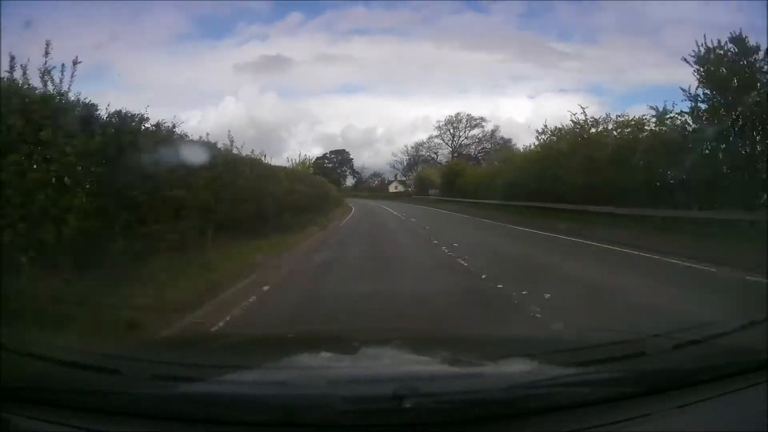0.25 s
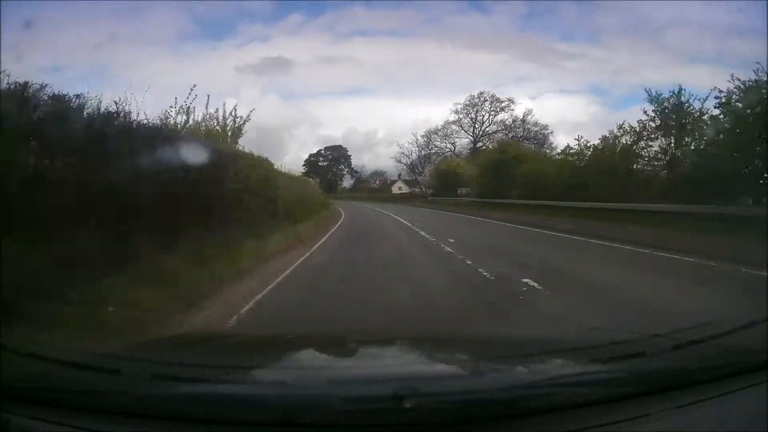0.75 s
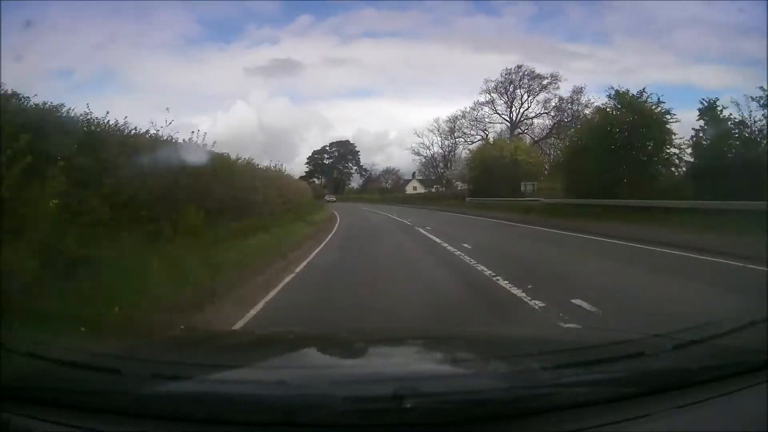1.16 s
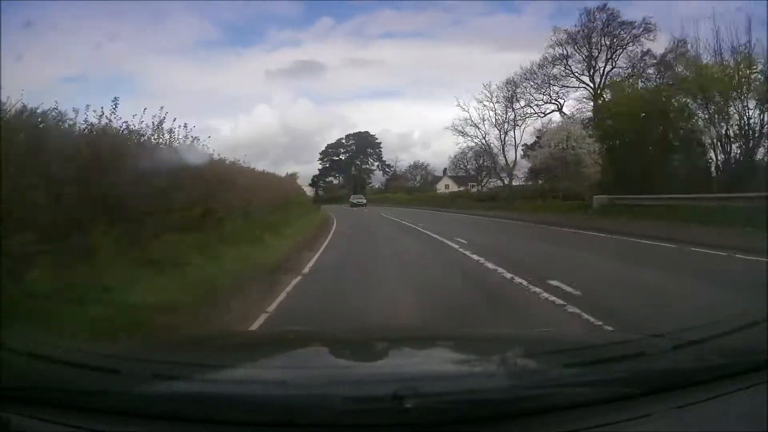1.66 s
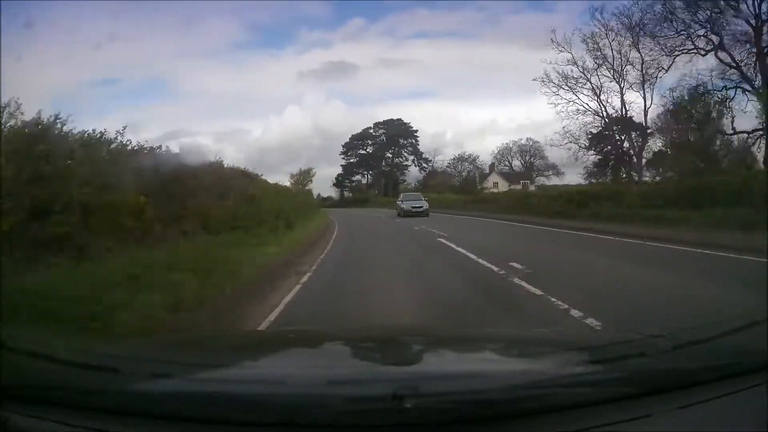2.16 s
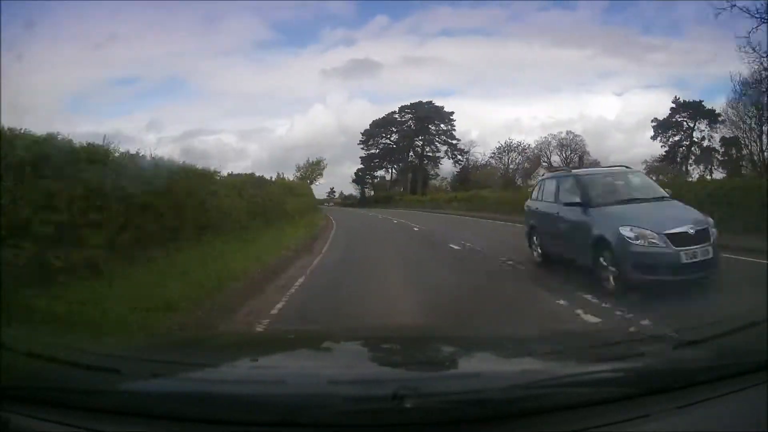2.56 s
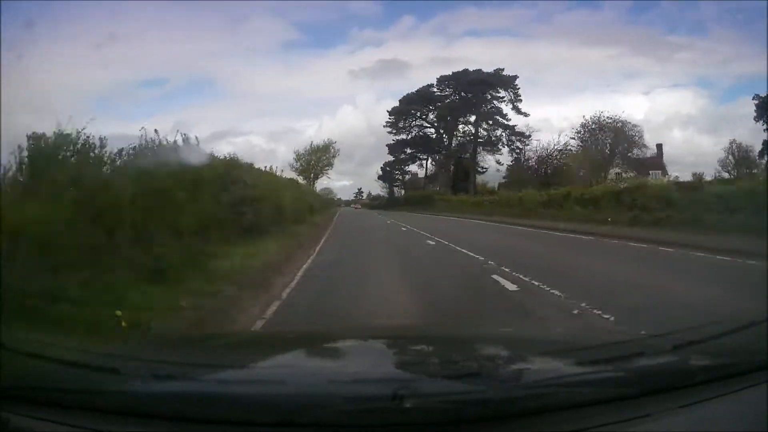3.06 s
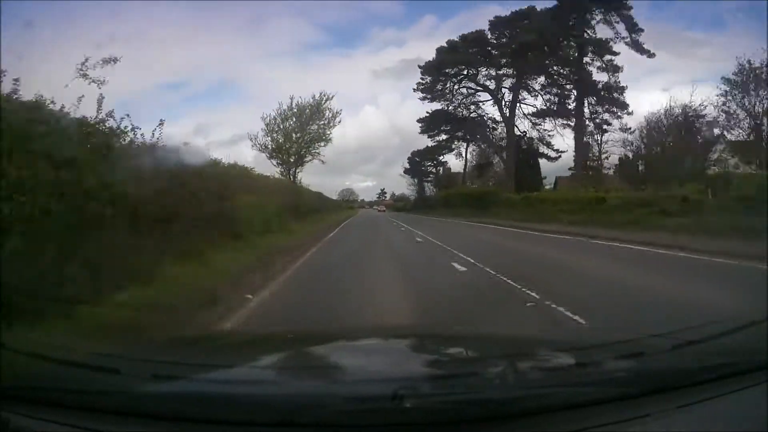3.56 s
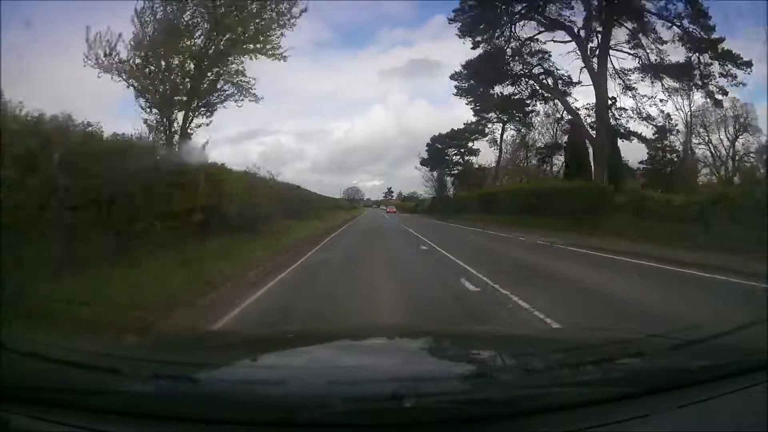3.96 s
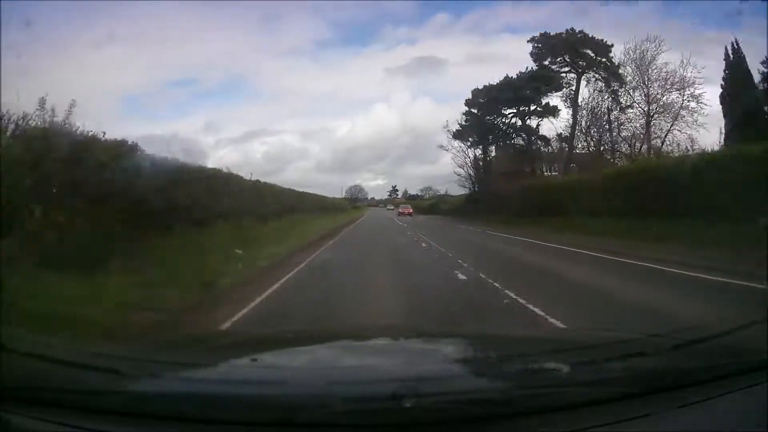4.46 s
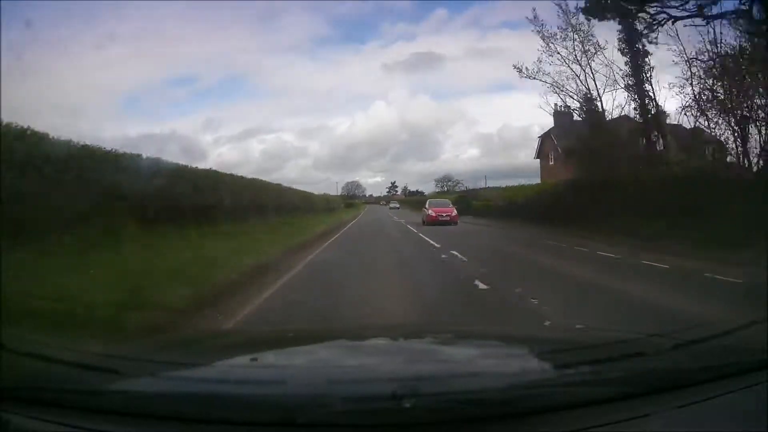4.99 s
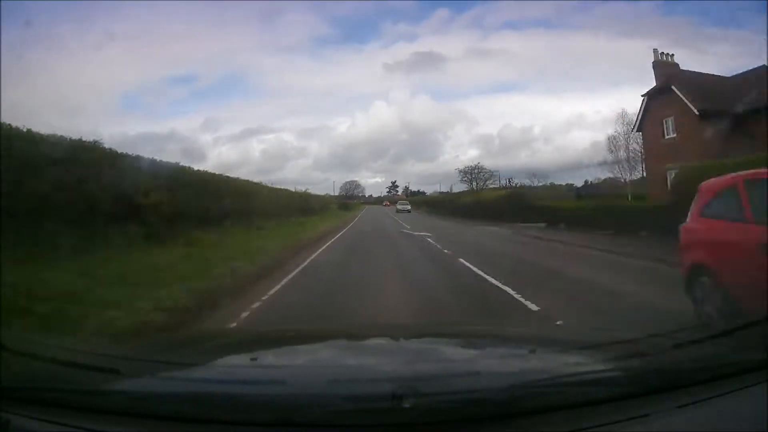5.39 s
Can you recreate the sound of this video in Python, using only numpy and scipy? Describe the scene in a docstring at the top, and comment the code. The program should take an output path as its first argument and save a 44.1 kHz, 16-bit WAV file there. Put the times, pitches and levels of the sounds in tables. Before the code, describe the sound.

A dull, boxy car interior with continuous road roar and engine hum. A few light plastic ticks come first, then a dense irregular rattle from one to three and a half seconds, including a sharp knock with brief chatter. As the rattle thins out, the coasting engine takes load again, its buzzing growl and intake noise swelling to the end. Everything is close and nearly dry, in mono.

```python
"""Car cabin on a country road

A five-cylinder engine coasts, then pulls: sine waves follow its turning, the loud ones sliding through the
cabin boom, with intake noise beside them. Shaped noise makes the rumble, tyre roar and wind hiss.
A loose plastic part by the microphone rattles in ticks and once knocks hard: clicks set its modes ringing.
"""
import sys
import numpy as np
from scipy import signal
from scipy.fft import rfft, irfft
from scipy.io import wavfile

SR = 44100
rng = np.random.default_rng(int(sys.argv[2]) if len(sys.argv) > 2 else 0)


def transcribe(signal):
    """Save signal, clipped to [-1, 1], as a 16-bit WAV file at the path in sys.argv[1]."""
    frames = np.atleast_2d(signal).T
    limited = np.clip(frames, -1, 1)
    pcm = np.round(limited * 32767).astype(np.int16)
    wavfile.write(sys.argv[1], SR, pcm)


N = 248283
TIME = np.arange(N) / SR  # seconds

# how the engine runs; five firings a cycle: (time [s], engine cycles [Hz], load [dB])
ENGINE_COURSE = [(0, 26.43, -7.5), (.5, 26.36, -10.5), (1.05, 25.63, -15.5), (1.75, 25.34, -16),
                 (2.4, 25.28, -12), (2.75, 25.11, -6.5), (3.15, 25.09, -1), (3.6, 25.24, -0.5),
                 (4.0, 25.65, 1.5), (4.55, 26.05, 3.5), (5.1, 26.6, 4), (5.63, 27, 5.5)]


def from_db(db):
    """Turn decibels into a gain."""
    return 10 ** (np.asarray(db) / 20)


def rms_one(x):
    """Scale a sound to an rms (average strength) of 1."""
    return x / np.sqrt(np.mean(x ** 2) + 1e-20)


def in_time(rows):
    """Draw straight lines between the rows of a table, giving each column a value at every sample."""
    seconds, *columns = np.transpose(rows)
    return [np.interp(TIME, seconds, column) for column in columns]


def at_hz(points, hz):
    """Read a level between the points of a spectrum, on a log-frequency axis."""
    point_hz, point_db = np.transpose(points)
    return np.interp(np.log(hz), np.log(point_hz), point_db)


def drift(rate_hz):
    """Wander slowly by chance: noise through two equal one-pole low-passes at rate_hz, spread 1."""
    step = 40  # one slow value for every 40 samples
    pole = np.exp(-2 * np.pi * rate_hz * step / SR)
    noise = rng.standard_normal(N // step + 2002)
    slow = signal.lfilter([1], [1, -2 * pole, pole * pole], noise)[2000:]  # drop the filter's start
    return np.interp(np.arange(N) / step, np.arange(len(slow)), rms_one(slow))


def coloured(spectrum):
    """Shape noise to a spectrum that falls away beyond both its ends; rms 1."""
    hz = np.arange(N // 2 + 1) * SR / N + 1  # 1 Hz up, so that the logarithm exists
    above = np.maximum(hz / spectrum[-1][0], 1) ** -4
    below = np.minimum(hz / spectrum[0][0], 1) ** 3
    shape = from_db(at_hz(spectrum, hz)) * above * below
    return rms_one(irfft(rfft(rng.standard_normal(N)) * shape, N))


def peaks(x, table):
    """Pass a sound through a chain of resonances (boosts) and dips (cuts)."""
    for hz, width_hz, boost_db in table:
        cosine = np.cos(2 * np.pi * hz / SR)
        gain = from_db(boost_db / 2)
        width = np.pi * width_hz / SR
        top = [1 + width * gain, -2 * cosine, 1 - width * gain]
        bottom = [1 + width / gain, -2 * cosine, 1 - width / gain]
        x = signal.lfilter(top, bottom, x)
    return x


def ring(clicks, hz, t60):
    """Let each click start a dying sine; a unit click gives height 1, and t60 [s] is the time to fall 60 dB."""
    decay = from_db(-60 / (t60 * SR))
    angle = 2 * np.pi * hz / SR
    bottom = [1, -2 * decay * np.cos(angle), decay * decay]
    return signal.lfilter([0, np.sin(angle)], bottom, clicks + 1e-18)


def soften(x, hz):
    """Low-pass: a contact that lasts a moment excites little treble."""
    return signal.sosfilt(signal.butter(4, hz, fs=SR, output="sos"), x)


def road(grain_db, gust_db):
    """Noise for body rumble, suspension thrum, tyre roar and wind; surface grain flickers roar and hiss."""
    # tyre roar over time: (time [s], level [dB])
    roar_course = [(0.0, -22), (0.15, -19.5), (.56, -21), (.65, -23), (.72, -18.5), (.85, -22),
                   (1.2, -19.5), (2.08, -22.5), (2.42, -21), (3.0, -22), (3.25, -20), (3.6, -23),
                   (3.84, -20.5), (4.09, -23), (4.51, -20), (5.6, -20.5)]
    # tyre roar through the body: (frequency [Hz], density [dB per Hz])
    roar_tone = [(400, -20.5), (520, -9), (700, -6), (930, -2), (1200, -6), (1600, -18), (2100, -39)]
    # panels that colour the tyre roar: (frequency [Hz], width [Hz], boost [dB])
    panels = [(705, 45, 3), (891, 42, 5.5), (964, 40, 4), (1138, 52, 3.5)]
    # rumble through the body: (frequency [Hz], density [dB per Hz])
    rumble_tone = [(60, -20.5), (100, -4), (160, -3), (240, -3), (290, 0.5), (380, 3.5), (480, -2),
                   (600, -13)]
    # colour of the suspension thrum: (frequency [Hz], density [dB per Hz])
    thrum_tone = [(20, -7.5), (40, -2.5), (65, -8)]
    # colour of the wind hiss: (frequency [Hz], density [dB per Hz])
    hiss_tone = [(1400, 4), (2000, -2.5), (2900, -11.5), (4000, -15), (5000, -25), (6200, -26.5),
                 (7600, -29.5), (9000, -57), (11300, -33), (12600, -56), (16000, -80.5)]
    rumble_db, rumble_swell_db = -29, 0.9
    thrum_db, thrum_swell_db = -45, 1
    hiss_db, hiss_db_per_hz, pull_s = -39.5, 1.6, 3.7

    roar_db, = in_time(roar_course)
    cycle_hz = in_time(ENGINE_COURSE)[0]
    # from pull_s on, the hiss grows with speed, read from the engine cycle
    faster_hz = (cycle_hz - np.interp(pull_s, TIME, cycle_hz)) * (TIME > pull_s)
    grain = drift(12)
    gusts = 0.37 * grain + drift(43)
    rumble = from_db(rumble_db + rumble_swell_db * drift(3)) * coloured(rumble_tone)
    thrum = from_db(thrum_db + thrum_swell_db * drift(1.5)) * coloured(thrum_tone)
    roar = from_db(roar_db + grain_db * grain) * peaks(coloured(roar_tone), panels)
    hiss = from_db(hiss_db + hiss_db_per_hz * faster_hz + gust_db * gusts) * coloured(hiss_tone)
    return rumble + thrum + roar + hiss


def touches():
    """List each blow and its two lighter lead-in touches: times, then strengths on low, middle, treble modes."""
    # rattle blows: (time [s], level [dB], low modes relative to it [dB], lead-in [s])
    ticks = [(0.111, -23, 2, 0.0027), (.1161, -23.5, -5, .002), (0.165, -27.5, 8, .002),
             (.4276, -32, 1, .002), (0.5027, -33.5, -5, .002), (.524, -31.5, -5, .002),
             (.6413, -26.5, -3, 0.0021), (.6479, -29, -14, .002), (1.072, -29, -19, .002),
             (1.1209, -26, 3, 0.0034), (1.148, -18, -1, .004), (1.1777, -12.5, 3, .003),
             (1.2105, -36, -2, .002), (1.3078, -25.5, -16, 0.0023), (1.339, -27.5, -10, .002),
             (1.392, -26.5, -2, 0.005), (1.3998, -21, -9, 0.0038), (1.478, -28.5, -9, 0.0019),
             (1.5545, -25.5, 4, 0.0038), (1.5608, -21.5, -1, .002), (1.586, -28, 7, .002),
             (1.6659, -22.5, -3, 0.0019), (1.67, -20, -3, .002), (1.6964, -23, -5, 0.0016),
             (1.7222, -27, -4, .002), (1.8795, -34, -2, .002), (1.9116, -18.5, 0, 0.0032),
             (1.991, -13, 5.5, .002), (2.0458, -14, 4, 0.0023), (2.1191, -23, 3, 0.0021),
             (2.1232, -18.5, 2, .002), (2.1539, -21, 1, .002), (2.1934, -24.5, 5, .003),
             (2.2307, -30, -10, 0.0086), (2.239, -15, 2.5, .003), (2.2736, -20, -8, .002),
             (2.2787, -16.5, 3, .002), (2.3281, -14, 3.5, 0.0052), (2.376, -20, 6, 0.0021),
             (2.4104, -12, -3, 0.011), (2.42, -25, 1, .003), (2.5058, -25, -12, .002),
             (2.512, -16.5, 3.5, .002), (2.561, -15.5, 5, 0.0069), (2.6112, -17.5, 8, 0.0066),
             (2.6428, -23, -9, 0.0021), (2.6805, -26.5, -4, .002), (2.7256, -29.5, -8, .002),
             (2.798, -27.5, -1, .007), (2.858, -13.5, 7, .005), (2.9039, -22, -6, .002),
             (2.908, -15.5, 5.5, 0.0018), (2.9456, -13, 7, .002), (2.9946, -19.5, 11.5, 0.0019),
             (3.0459, -18.5, 5.5, 0.0048), (3.0798, -26.5, -4, .002), (3.124, -35, -2, .002),
             (3.1508, -27.5, -2, .002), (3.212, -22, -3, .002), (3.219, -19.5, 5, 0.0068),
             (3.2976, -17, 6.5, 0.0049), (3.339, -23.5, -4, .002), (3.3455, -18, 7.5, 0.0036),
             (3.6744, -25.5, -11, 0.0019), (3.7559, -30.5, -5, .002), (3.9503, -22, 0, 0.0018),
             (4.0106, -31, -10, 0.0027), (4.0745, -27.5, -10, .002)]
    lead_db, lead_db_per_s = -9.5, -1000  # a lead-in touch is weaker, more so the earlier it comes
    # treble against the middle modes [dB]; below the knee it loses further dB per dB
    treble_base_db, treble_knee_db, treble_follows, treble_scatter_db = -11, -25, 1.2, 2.5

    blow_s, blow_db, blow_low_db, lead_s = np.transpose(ticks)
    share = rng.uniform([.85, .3], [1, .7], (len(blow_s), 2))  # of the lead-in, for each of the two touches
    early_s = lead_s[:, None] * share
    lead_scatter_db = rng.normal(0, 3, (len(blow_s), 2))
    scatter_db = rng.normal(0, treble_scatter_db, len(blow_s))
    lead_level_db = blow_db[:, None] + lead_db + lead_db_per_s * early_s + lead_scatter_db

    # all blows first, then all lead-in touches
    touch_s = np.r_[blow_s, (blow_s[:, None] - early_s).ravel()]
    middle_db = np.r_[blow_db, lead_level_db.ravel()]
    low_db = np.r_[blow_low_db, np.repeat(blow_low_db, 2) / 2]
    under_knee_db = np.minimum(middle_db - treble_knee_db, 0)
    treble_db = treble_base_db + treble_follows * under_knee_db
    treble_db += np.r_[scatter_db, np.repeat(scatter_db, 2)]
    return touch_s, (middle_db + low_db, middle_db, middle_db + treble_db)


def rattle():
    """Each touch strikes every mode with its own strength; the part grates as it slides in and settles."""
    # modes of the rattling part: (frequency [Hz], level [dB], 60 dB decay [s])
    part_modes = [(1930, -13, 0.012), (2263, -8, 0.013), (2466, -3.5, 0.015), (2804, -10, 0.011),
                  (3360, -10, 0.01), (4000, -5, 0.01), (4460, -5, 0.011), (4800, -7.5, 0.0084),
                  (5710, -8, 0.0095), (6590, -14, 0.0092), (7580, -16.5, 0.0081), (8340, -27, 0.0069),
                  (9730, -11, 0.01), (10300, -13, 0.0091), (10750, -14, .006), (11670, -1, 0.0049),
                  (12500, -9, .006), (13300, -2.5, .006), (14000, -10, .006), (14900, -5, 0.0033),
                  (15600, -14, .005)]
    # low, middle and treble modes: (from [Hz], to [Hz], contact low-pass [Hz])
    registers = [(0, 3000, 6000), (3000, 9000, 9500), (9000, 17000, 17000)]
    spread_db = 3.8  # scatter of each mode from touch to touch
    slide_db, slide_s, settle_s = -27, .002, .003  # grating: level against the touch, rise, fall

    touch_s, strengths_db = touches()
    at = np.round(touch_s * SR).astype(int)
    since = np.arange(-600, 600) / SR
    grate = from_db(slide_db) * np.exp(np.where(since < 0, since / slide_s, -since / settle_s))
    # sparse random clicks, shared by every other mode
    grit = rng.standard_normal((2, N)) * (rng.random((2, N)) < .15)
    out = np.zeros(N)
    # where a touch lands sets its share of low, middle and treble modes
    for (low_hz, high_hz, contact_hz), touch_db in zip(registers, strengths_db):
        modes = [mode for mode in part_modes if low_hz < mode[0] < high_hz]
        blows, rings = np.zeros(N), np.zeros(N)
        blows[at] = from_db(touch_db)
        rubbing = signal.fftconvolve(blows, grate, "same")
        chance = rng.standard_normal((len(at), len(modes)))
        for k, (hz, mode_db, t60) in enumerate(modes):
            clicks = rubbing * grit[k % 2]
            # neighbouring modes start in opposite directions
            clicks[at] += (-1) ** k * from_db(touch_db + spread_db * chance[:, k])
            rings += from_db(mode_db) * ring(clicks, hz, t60)
        out += soften(rings, contact_hz)
    return out


def knock(per_s, blow):
    """One blow, then fast uneven chatter that dies away, sets the knock's modes ringing."""
    # modes that the knock sets ringing: (frequency [Hz], level [dB], 60 dB decay [s])
    knock_modes = [(950, 1, .012), (1200, 0, .012), (1800, -4, .018), (2200, -8, .01), (2550, -3, .016),
                   (3000, -7, .01), (3500, -9, .008), (4000, -7, .01), (4600, -10, .008), (5400, -13, .008),
                   (6400, -20, .008), (7400, -22, .008)]
    start_s, level_db, chatter_t60_s = 2.621, -17.5, 0.091

    since = TIME - start_s
    # random strengths at shared random moments, per_s of them a second
    chatter = rng.standard_normal((len(knock_modes), N)) * (rng.random(N) < per_s / SR)
    chatter[:, round(start_s * SR) + 1] = blow * (-1) ** np.arange(len(knock_modes))
    dying = from_db(level_db - 60 * np.maximum(since, 0) / chatter_t60_s) * (since >= 0)
    rings = np.zeros(N)
    for clicks, (hz, mode_db, t60) in zip(chatter, knock_modes):
        rings += from_db(mode_db) * ring(dying * clicks, hz, t60)
    return soften(rings, 9800)


def engine():
    """Sines on multiples (orders) of the engine cycle waver with uneven combustion; the intake roars as noise."""
    # faint orders at load 0: (multiple of the cycle, rms level [dB])
    faint_orders = [(4, -44), (9, -42), (20, -41), (22, -39), (24, -36), (25, -41)]
    # loud orders at load 0: (multiple of the cycle, rms level [dB], share of the load's swing [dB per dB])
    loud_orders = [(10, -33.5, 0.57), (14, -30, 1.05), (15, -28.5, 0.99), (16, -32.5, 1.05), (17, -26, 1.3)]
    # cabin boom that the loud orders slide through: (frequency [Hz], gain [dB])
    boom = [(250, 1.5), (258, 0.5), (270, -10.5), (350, -0.5), (368, 1.3), (383, -12), (400, 1.5), (412, 0),
            (425, 3), (443, -2.6), (457, -8)]
    # moments when the drone dips briefly: (time [s], depth [dB])
    drone_dips = [(2.11, 9), (2.27, 24), (4.99, 5)]
    # air noise in the intake duct: (frequency [Hz], density [dB per Hz])
    intake_tone = [(500, -7), (700, 2), (1000, -17.5), (1900, -23), (2300, -17.5), (2800, -29.5),
                   (3400, -32), (4000, -42)]
    # resonances and dips of the duct: (frequency [Hz], width [Hz], boost [dB])
    duct = [(603, 40, 10.5), (695.5, 32, 10), (1980, 80, 4.5), (2110, 100, -10.5), (2300, 220, 7.5),
            (3420, 150, 12)]
    drone_db, drone_follows, drone_waver_db, dip_s = -25, 0.031, 1.46, 0.019  # follows: dB per dB of load
    waver_db, jitter_rad = 1.8, .55  # uneven combustion: spread of level and phase
    intake_db, intake_follows = -30.5, 1.5  # rms level at load 0, dB per dB of load

    cycle_hz, load_db = in_time(ENGINE_COURSE)
    turn = 2 * np.pi * np.cumsum(cycle_hz) / SR
    # the drone sounds at the firing rate, five times a cycle
    dips_db = sum(depth_db * np.exp(-((TIME - s) / dip_s) ** 2) for s, depth_db in drone_dips)
    drone_level_db = drone_db + drone_follows * load_db - dips_db + drone_waver_db * drift(8)
    sines = from_db(drone_level_db) * np.sin(5 * turn)

    orders = []
    for multiple, level_db, share in loud_orders:
        multiple = round(multiple)
        orders.append((multiple, level_db + share * load_db + at_hz(boom, multiple * cycle_hz)))
    for multiple, level_db in faint_orders:
        orders.append((multiple, level_db + load_db))
    for multiple, level_db in orders:
        phase = rng.uniform(0, 2 * np.pi) + jitter_rad * drift(4)
        sines += from_db(level_db + waver_db * drift(4.9)) * np.sin(multiple * turn + phase)

    intake = rms_one(peaks(coloured(intake_tone), duct))
    # the root of 2 turns rms levels into sine heights
    return np.sqrt(2) * sines + from_db(intake_db + intake_follows * load_db) * intake


def scene():
    """Add everything at the one microphone, whose housing colours the road and wind."""
    # resonances of the microphone housing: (frequency [Hz], width [Hz], boost [dB])
    housing = [(2563, 500, 10), (3460, 200, -3), (4455, 550, 9), (5510, 580, 14)]
    air = peaks(road(grain_db=0.54, gust_db=1.26), housing)
    loose = rattle() + knock(per_s=3700, blow=3.0)
    return (engine() + air + loose)[None]


def record(dry):
    """Dip a part of the treble, round the peaks and cut the top above 16 kHz."""
    # two neighbouring dips where the microphone is nearly deaf: (frequency [Hz], width [Hz], boost [dB])
    port_dip = [(8720, 400, -16), (9230, 500, -23.5)]
    heard = 0.96 * np.tanh(peaks(dry, port_dip) / 0.92)
    return signal.sosfilt(signal.cheby2(24, 60, 16000, fs=SR, output="sos"), heard)


dry = scene()
out = record(dry)
transcribe(out)
```